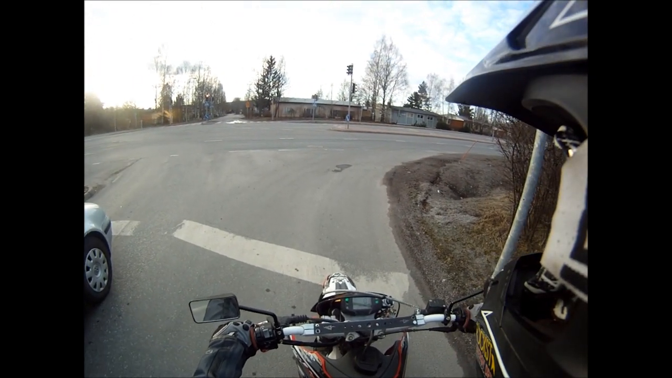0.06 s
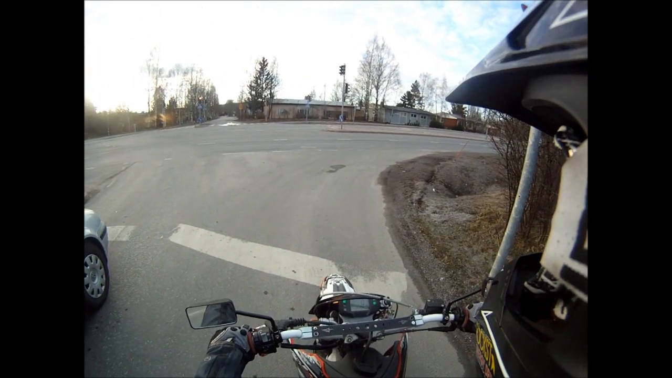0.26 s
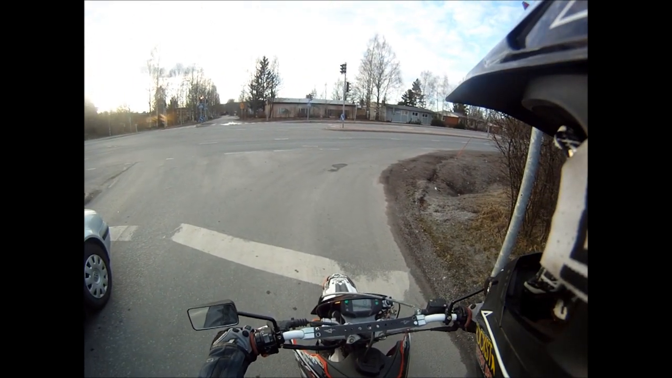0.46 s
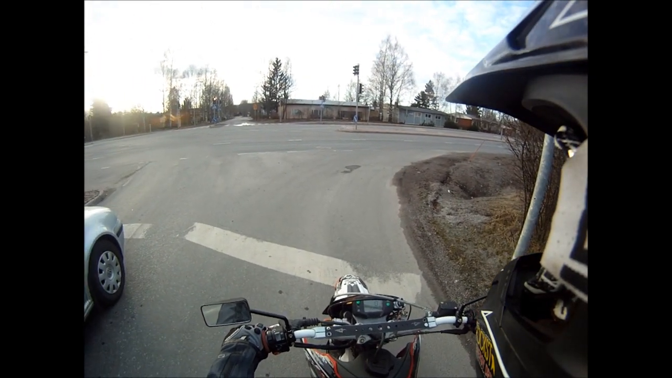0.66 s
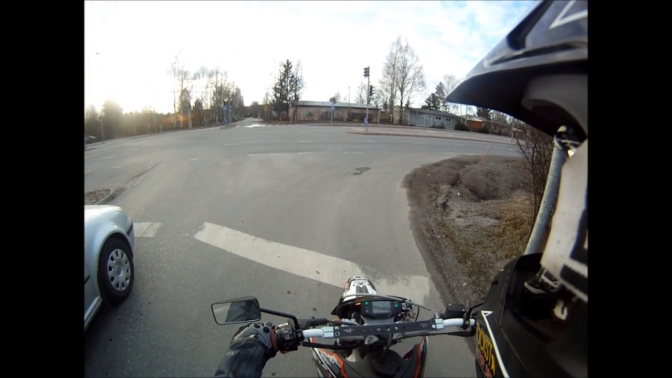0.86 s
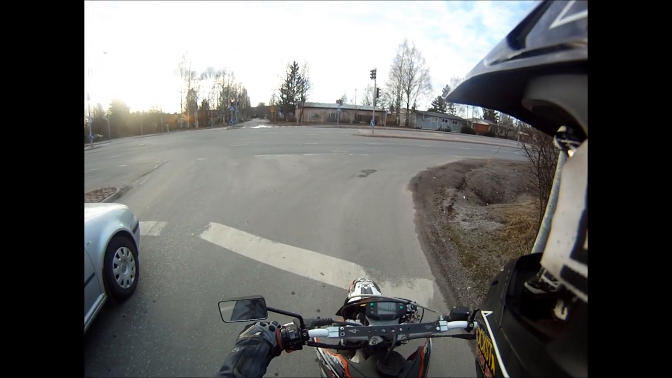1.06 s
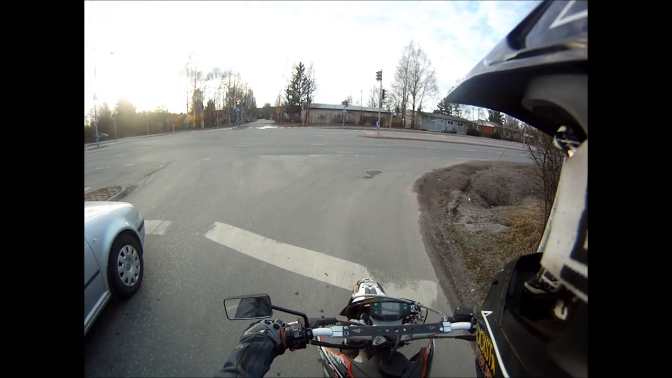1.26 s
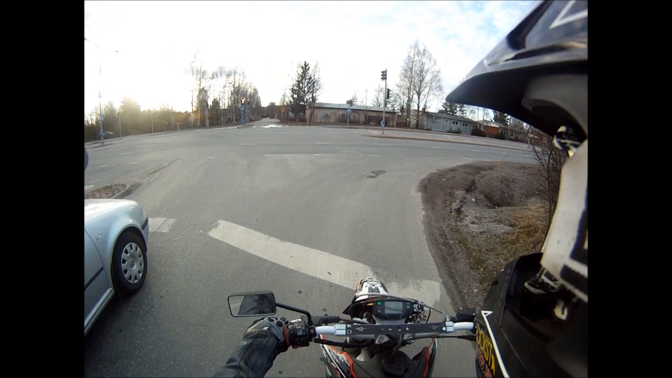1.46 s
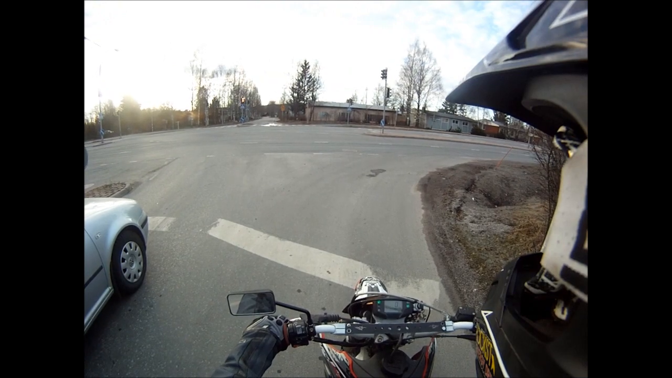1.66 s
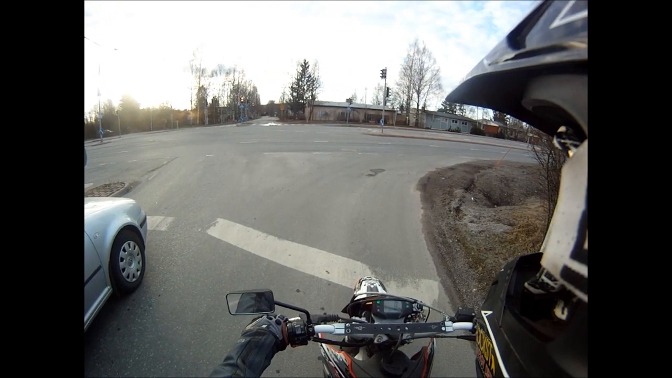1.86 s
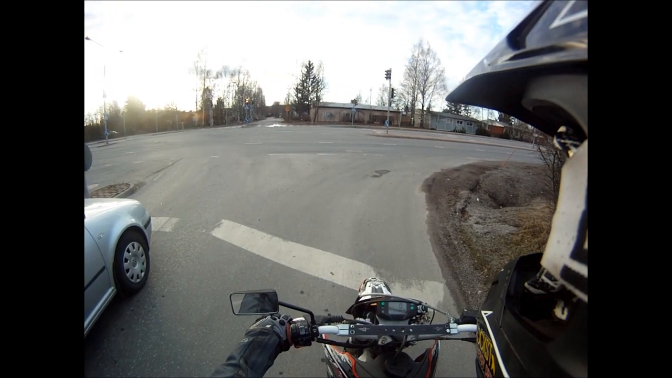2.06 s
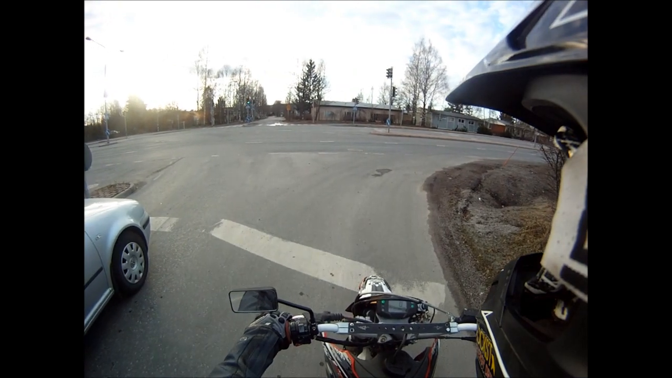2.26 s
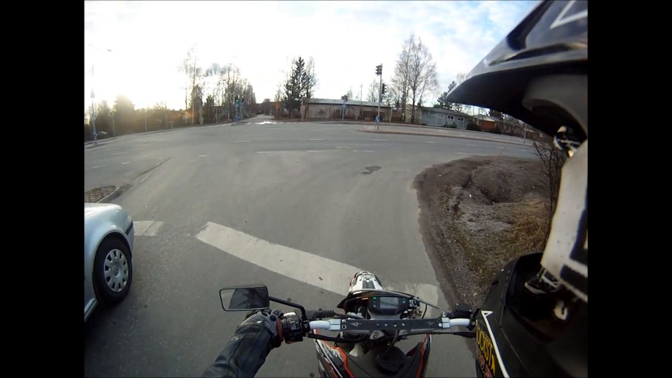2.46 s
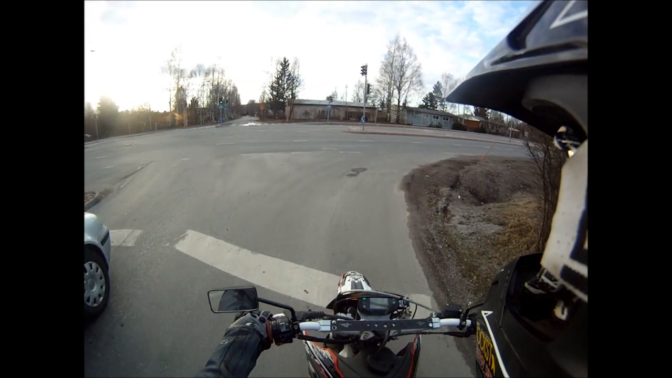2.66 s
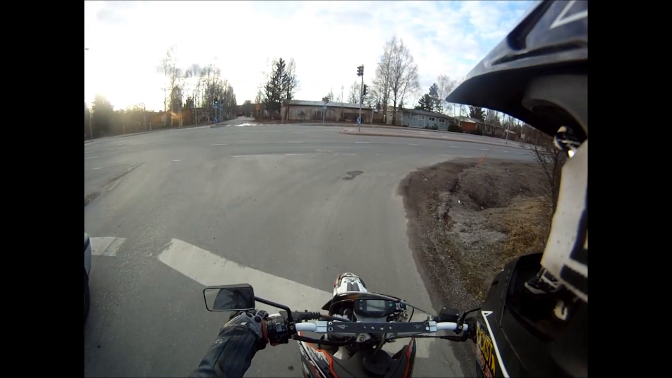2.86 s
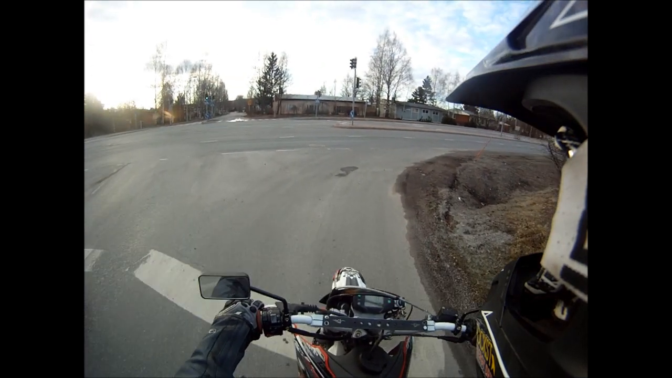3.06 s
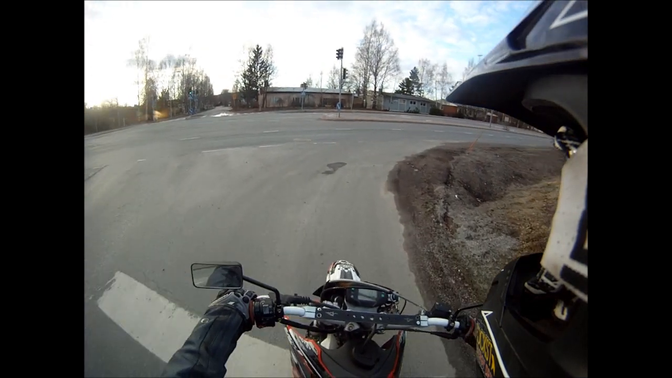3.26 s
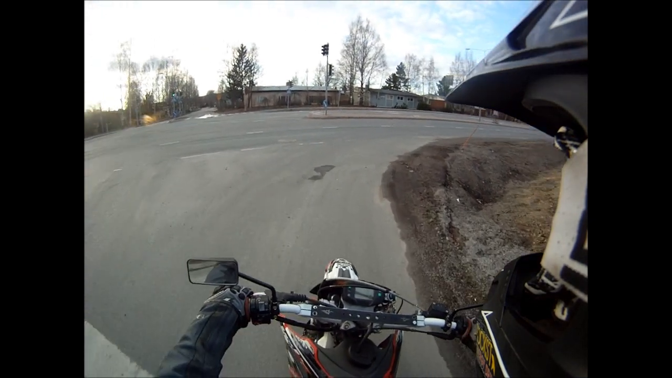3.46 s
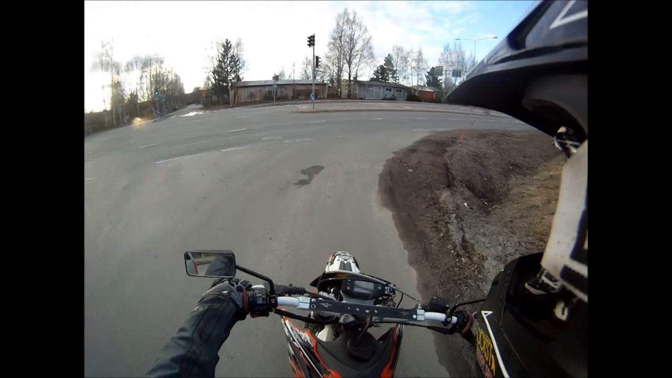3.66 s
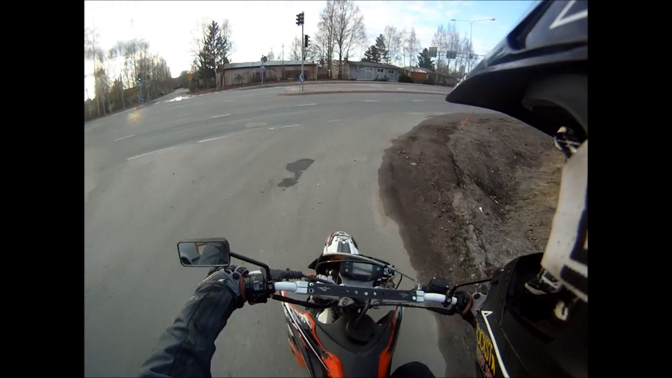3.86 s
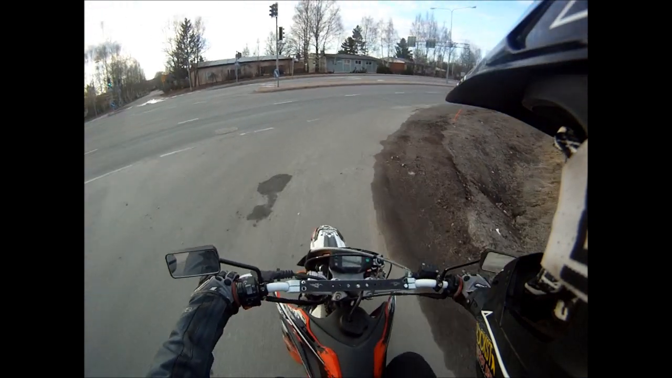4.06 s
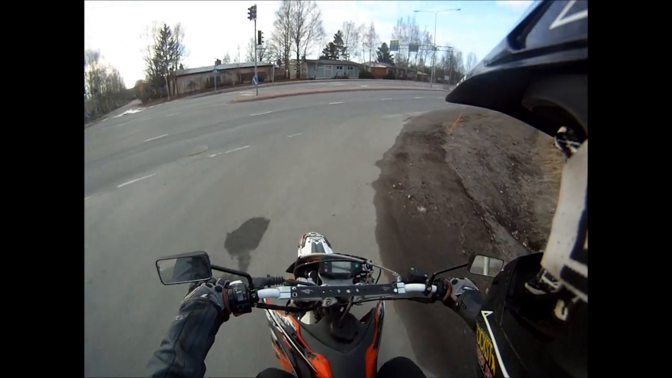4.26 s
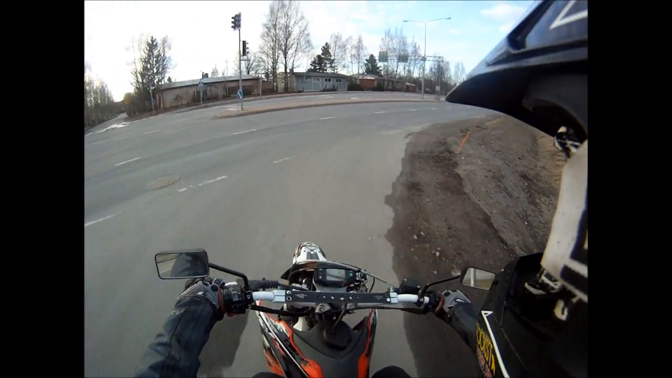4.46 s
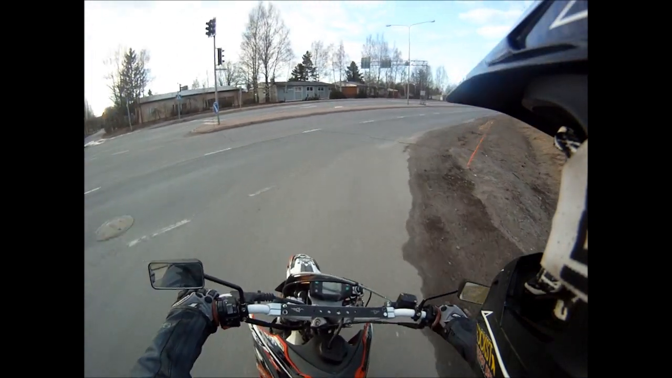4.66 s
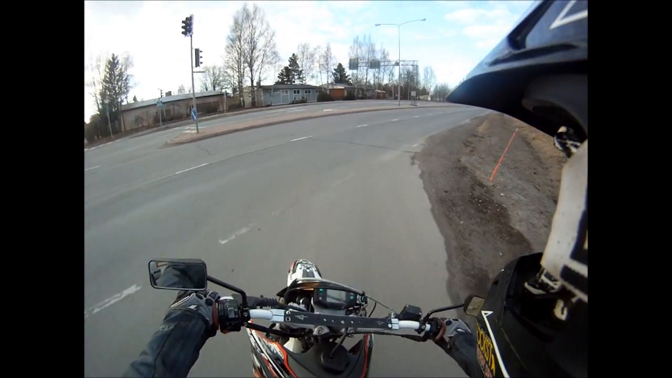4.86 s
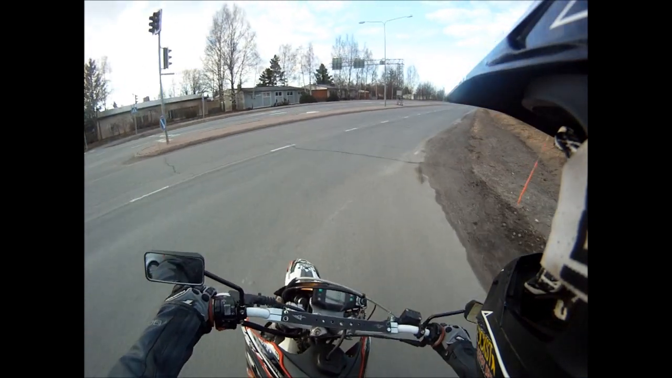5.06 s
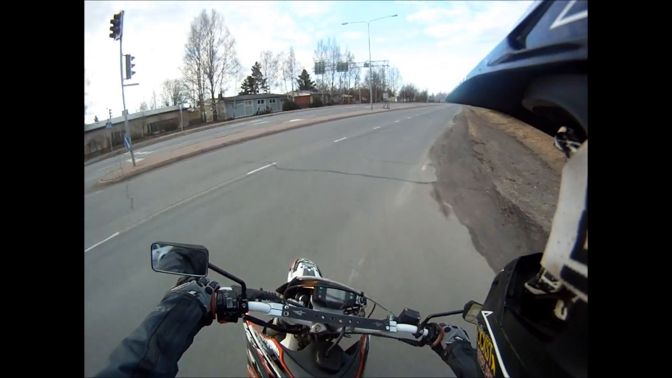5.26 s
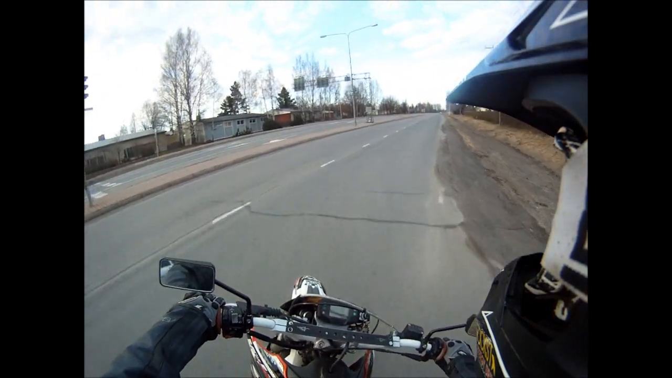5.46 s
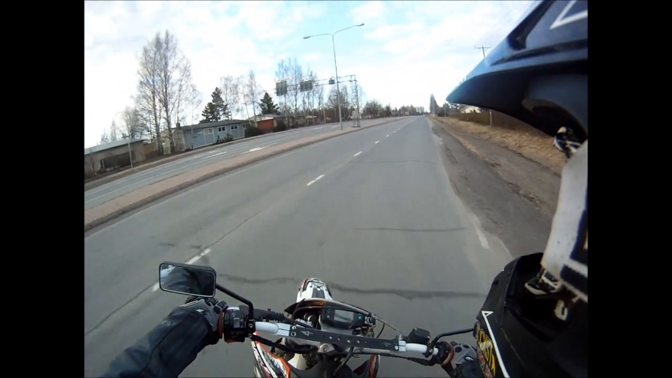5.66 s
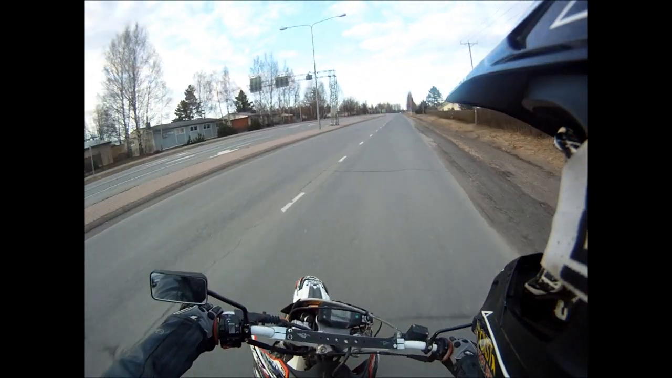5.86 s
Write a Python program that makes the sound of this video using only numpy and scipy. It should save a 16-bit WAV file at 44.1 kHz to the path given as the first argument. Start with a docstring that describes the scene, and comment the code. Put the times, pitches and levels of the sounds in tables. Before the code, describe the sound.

A mono helmet microphone sits close above a small two-stroke motorcycle, outdoors at a road junction. From 0 to 1.5 s the engine idles lumpily, about ten uneven soft chugs a second over bright metallic clatter, with sharper ticks near 0.25 and 0.7 s. A waiting car adds a very low, faint throb that falls behind after 2.1 s. At about 1.6 s the throttle is cracked: the exhaust swells into a ragged, honking, stuttering note, with a short row of fading knocks from 2.1 s. At 2.5 s it opens wide with a deep gulp and becomes a clean, hollow boom, holding nearly steady and creeping upward until 4.4 s. Brief misfires stutter around 4.5 to 4.9 s, then the pitch climbs fast, barking and rasping around 5 to 5.5 s, still rising at the end near 5.9 s. Low wind lumps buffet faintly around 5 s; thin, coarse fizz coats everything.

```python
"""A small two-stroke motorcycle idles lumpily and pulls away; its exhaust pulses ring the pipe, silencer and mouth.
It fires hard on every second turn as the throttle opens, runs clean, stutters again and revs out.
Piston slaps ring the metal fins close below; a waiting car, a low two-tone throb, falls behind.
The microphone is a camera on the rider's helmet: noise shaped as wind buffets it,
and its coarse sampling mirrors the sound into a thin fizz."""
import sys
import numpy as np
from scipy import signal
from scipy.fft import rfft, irfft, next_fast_len
from scipy.io import wavfile
from scipy.ndimage import map_coordinates

SR = 44100
rng = np.random.default_rng(int(sys.argv[2]) if len(sys.argv) > 2 else 0)


def log_audio(samples):
    """Write samples as a 16-bit WAV file to the path given in sys.argv[1]."""
    # one column per channel
    frames = np.atleast_2d(samples).T
    # limit to full scale, then quantise
    limited = np.clip(frames, -1, 1)
    pcm = np.round(limited * 32767).astype(np.int16)
    wavfile.write(sys.argv[1], SR, pcm)


N = 261072
TIME = np.arange(N) / SR  # seconds


def amp(db):
    """Decibels to gain."""
    return 10 ** (np.asarray(db) / 20)


def unit(x):
    """x at rms 1."""
    return x / np.sqrt(np.mean(x ** 2) + 1e-20)


def even(x, size=4001):
    """x at a running rms of 1 under a bell window of 2 * size samples; faster throbs stay."""
    window = np.hanning(2 * size)
    energy = signal.fftconvolve(x ** 2, window, "same")
    weight = signal.fftconvolve(np.ones(N), window, "same")
    return x / np.sqrt(np.abs(energy / weight) + 1e-14)


def curve(rows):
    """Rows of (seconds, value) as one value per sample."""
    return np.interp(TIME, *np.transpose(rows))


def wobble(rate):
    """A smooth random curve, rate knots a second."""
    knots = rng.standard_normal(int(N * rate / SR) + 4)
    return map_coordinates(knots, [TIME * rate / SR])


def hump(x, centre, width):
    """A bell of height 1 around the centre."""
    return np.exp(-.5 * ((x - centre) / width) ** 2)


def opened(start_s, end_s):
    """A straight movement from 0 to 1, such as a throttle's."""
    return np.clip((TIME - start_s) / (end_s - start_s), 0, 1)


def settling(start_s, time_s):
    """1 until the start, then dying away to 0."""
    return np.exp(-np.maximum(TIME - start_s, 0) / time_s)


def noise():
    """White noise."""
    return rng.standard_normal(N)


def pulses(times, sizes, order=8):
    """Impulses placed between samples, each a windowed sinc."""
    at = np.floor(times * SR).astype(int)[:, None] + np.arange(1 - order, order + 1)
    offset = at - times[:, None] * SR
    inside = (at >= 0) * (at < N)
    shape = sizes[:, None] * np.sinc(offset) * np.sinc(offset / order) * inside
    return np.bincount(np.clip(at, 0, N - 1).ravel(), shape.ravel(), N)


def puffs(times, sizes, decay_s):
    """Noise that flares at each time and dies away."""
    kicks = np.bincount(np.clip(times * SR, 0, N - 1).astype(int), sizes, N)
    flare = signal.lfilter([1], [1, -np.exp(-1 / (SR * decay_s))], kicks)
    return flare * noise()


def ring(x, points):
    """x through a minimum-phase body with the (Hz, dB) response: nothing sounds before it is struck."""
    m = 2 * next_fast_len(N)
    hz, db = np.transpose(points)
    log_hz = np.log(np.fft.rfftfreq(m, 1 / SR) + 1)
    cepstrum = irfft(np.log(amp(np.interp(log_hz, np.log(hz), db))))
    # folding the cepstrum onto positive time makes the response causal
    cepstrum[1:m // 2] *= 2
    cepstrum[m // 2 + 1:] = 0
    return irfft(rfft(x, m) * np.exp(rfft(cepstrum)))[:N]


def resonance(x, hz, q):
    """The part of x that one mode picks up."""
    return signal.lfilter(*signal.iirpeak(hz, q, SR), x)


def linger(x, hz, width_hz):
    """A cavity stores sound near its resonance and lets it out late (an all-pass)."""
    radius = np.exp(-np.pi * width_hz / SR)
    poles = np.array([1, -2 * radius * np.cos(2 * np.pi * hz / SR), radius ** 2])
    return signal.lfilter(poles[::-1], poles, x)


def diffuse(x, t60):
    """x smeared by a dying noise tail, like many close metal modes that fall 60 dB in t60 seconds."""
    t = np.arange(SR // 8) / SR
    tail = rng.standard_normal(len(t)) * amp(-60 * t / t60)
    return signal.fftconvolve(x, tail / np.linalg.norm(tail))[:N]


# Steady air on the helmet microphone. Each row: time in seconds, level in dB.
WIND_LEVEL = [(1.6, -42), (3, -52), (4, -47), (5.9, -43)]
# Two gusts on top of it. Each row: centre in seconds, added level in dB.
WIND_GUSTS = [(4.99, -35.5), (5.38, -42)]
# Tone of the air around the helmet. Each row: frequency in Hz, gain in dB.
WIND_TONE = [(12, -27), (25, -15), (50, -5), (100, -6.5), (200, -23), (600, -52), (3000, -95)]
GUST_WIDTH_S = 0.081


def wind():
    """Air buffets the helmet in lumps of low noise, with two gusts as the bike gathers speed."""
    gusts = sum(amp(db) * hump(TIME, s, GUST_WIDTH_S) for s, db in WIND_GUSTS)
    lumps = amp(2 * wobble(8.9))
    return (amp(curve(WIND_LEVEL)) + gusts) * unit(lumps * ring(noise(), WIND_TONE))


CAR_DB, CAR_LEFT_S, CAR_FADE_DB_PER_S = -41, 2.15, 20


def car():
    """The waiting car's engine throbs deep, a wavering tone and its octave, and falls behind."""
    phase = 2 * np.pi * np.cumsum(27.5 + .2 * wobble(3)) / SR
    level_db = CAR_DB - CAR_FADE_DB_PER_S * np.maximum(TIME - CAR_LEFT_S, 0)
    return amp(level_db) * unit(np.sin(phase) + amp(-12.5) * np.sin(2 * phase))


CRACK_S, OPEN_S = 1.582, 2.535  # the throttle is cracked, then opened wide
SKIP_SHARE, SKIP_EASING = 0.51, .5  # charge lost on every second turn; how far that clears up


def four_stroking(times):
    """Share of charge lost on every second turn: sets in with the throttle, eases, ends when it opens wide."""
    easing = 1 - SKIP_EASING * opened(2.3, 2.31)
    share = SKIP_SHARE * opened(1.6, 1.88) * easing * (TIME < OPEN_S)
    return np.interp(times, TIME, share)


# The crank idles, is blipped, held on the slipping clutch and revved out.
# Each row: time in seconds, speed in turns a second.
CRANK_SPEED = [(1.644, 40.3), (1.762, 49.3), (1.827, 48.1), (1.945, 60.7), (2.119, 66.0), (2.304, 64.0),
               (2.528, 64.7), (2.967, 79.7), (3.393, 81.9), (3.689, 84.7), (4.042, 85.5), (4.441, 89.5),
               (4.867, 99.2), (5.011, 104.1), (5.155, 111.8), (5.468, 125.7), (5.738, 141.9), (5.87, 146.4)]
# Spells of misfiring. Each row: first turn in seconds, last turn in seconds, mean share of charge lost (0 to 1).
MISFIRE_SPELLS = [(4.5, 4.5, .7), (4.662, 4.88, .78), (4.94, 4.94, .75), (5.905, 5.905, .58)]
MISFIRE_SCATTER = .12  # spread of the share lost from one misfire to the next


def crank():
    """Time and burnt charge of every turn of the crank; in a spell of misfiring every third turn fails."""
    angle = np.cumsum(curve(CRANK_SPEED)) / SR  # in turns
    angle -= np.interp(1.816, TIME, angle)  # one turn falls exactly at 1.816 s
    turn = np.arange(np.ceil(angle[0]), angle[-1])
    times = np.interp(turn, angle, TIME)
    lost = (turn % 2) * four_stroking(times)
    for first_s, last_s, share in MISFIRE_SPELLS:
        first = np.argmin(np.abs(times - first_s))
        last = np.argmin(np.abs(times - last_s))
        failed = np.arange(first, last + 1, 3)
        lost[failed] = np.clip(share + MISFIRE_SCATTER * rng.standard_normal(len(failed)), 0, 1)
    # unburnt mixture makes the next bang stronger
    return times, 1 - lost + 0.085 * np.roll(lost, 1)


# Ring of the clutch and gear case, also struck by the knocks. Each row: frequency in Hz, gain in dB.
CASE_RING = [(400, -22.5), (750, -1.5), (1000, -9.5), (1300, -1), (1550, -2.5), (1850, -18), (2600, -21),
             (6000, -54)]


def gears():
    """The slipping clutch churns in its case as shaped noise and quietens as it grips."""
    level_db = -42.0 - 4.5 * opened(2.6, 3.4) + 0.68 * wobble(12)
    return amp(level_db) * unit(ring(noise(), CASE_RING))


RATTLE_S, RATTLE_DB, RATTLE_FADE_DB = 2.1047, -17, 1.5  # start, first strength, loss per slap


def rattle(times, count=7):
    """As the clutch bites the piston slaps on every fourth turn, ever softer: rows of (s, dB)."""
    turns = times[np.argmin(np.abs(times - RATTLE_S))::4][:count]
    strength_db = RATTLE_DB - RATTLE_FADE_DB * np.arange(count)
    return np.column_stack([RATTLE_S + turns - turns[0], strength_db])


# Single hard piston slaps, close to the microphone. Each row: time in seconds, strength in dB.
HARD_SLAPS = [(0.2493, -22), (0.7206, -27), (1.9524, -18), (4.5925, -30.5), (4.6982, -29), (4.7416, -24)]
# The cylinder's metal ring, also heard in the clatter. Each row: frequency in Hz, gain in dB.
FIN_RING = [(1000, -35.5), (1700, -8.5), (1980, -4.5), (2180, -0.5), (2820, 0.5), (3090, -8), (3520, -15),
            (3870, -12), (4100, -16), (4770, -12), (5900, -25.5), (7670, -57), (13000, -120)]


def knocks(times):
    """Now and then the piston slaps hard enough to tick in the fins and the gear case."""
    s, db = np.vstack([HARD_SLAPS, rattle(times)]).T
    slaps = puffs(s, amp(db), decay_s=0.0058)
    ticks = ring(slaps, FIN_RING) + 1.3 * ring(slaps, CASE_RING)
    # the loudest tick peaks at the highest strength
    return amp(np.max(db)) * ticks / np.max(np.abs(ticks))


# The scattered firings at idle, all equally strong. Each entry: time in seconds.
IDLE_FIRINGS = [.014, .1, .203, .26, .341, .441, 0.528, .652, .722, .805, .901, .978, 1.045, 1.126, 1.234,
                1.332, 1.403, 1.491, 1.541, 1.628, 1.687]


def chugging(width_s):
    """The swell of each firing at idle, about 1 high."""
    return sum(hump(TIME, s, width_s) for s in IDLE_FIRINGS)


CLATTER_DB, CLATTER_THROTTLE_DB = -37, 1.5  # at idle; more once the throttle is off its stop
SMOOTH_TURNS, SMOOTH_DB_PER_TURN = 135, 0.22  # above these turns a second the clatter recedes
BUZZ_TURNS, BUZZ_GROWTH = 59.5, 1.22  # turns a second at which the buzz gain is 1; how steeply it grows


def clatter(times, charge):
    """The piston slaps at both ends of its stroke and the fins ring; with revs the slaps merge into a buzz."""
    speed = curve(CRANK_SPEED)
    strokes = np.concatenate([times[:-1], times[:-1] + 0.38 * np.diff(times)])
    force = np.concatenate([.5 + .5 * charge[:-1], np.full(len(times) - 1, .6)])
    force = force * amp(6.0 * rng.standard_normal(len(strokes)))
    slaps = even(puffs(strokes, force, decay_s=0.0094)) + 1.52 * noise()
    beats = pulses(times, charge)
    buzz = (speed / BUZZ_TURNS) ** BUZZ_GROWTH * even(beats + 5.6 * diffuse(beats, t60=0.14))
    metal = ring((slaps + buzz) * (1 + 0.59 * chugging(width_s=0.0092)), FIN_RING)
    # two fin modes sing out at low revs
    singing = sum(resonance(metal, hz, q=46) for hz in (2430, 2890))
    level_db = CLATTER_DB + CLATTER_THROTTLE_DB * opened(CRACK_S, 1.8)
    level_db = level_db - SMOOTH_DB_PER_TURN * np.maximum(speed - SMOOTH_TURNS, 0)
    return amp(level_db) * even(metal + 0.8 * (1 - opened(1.8, 1.81)) * singing)


# The muffled pipe on little or no throttle, also heard in the pickup. Each row: frequency in Hz, gain in dB.
MUFFLED_PIPE = [(30, -41), (62, -21), (130, -17.5), (192, -16), (224, 0.5), (256, 2.5), (290, -4),
                (330, -8.5), (384, -16.5), (440, -10.5), (495, -23), (548, -10), (610, -19), (740, -37),
                (1550, -42.5), (3000, -90)]
# The whole pipe shaking at each idle firing. Each row: frequency in Hz, gain in dB.
SHAKEN_PIPE = [(60, -42), (120, -20), (175, -13), (205, -7.5), (240, -7), (270, -7.5), (320, -1),
               (395, -2.5), (440, -7), (490, -7.5), (600, -21), (800, -30), (1320, -34), (3000, -67)]


def idle(times):
    """The piston pumps a soft pulse every turn; the few turns that fire shake the whole pipe."""
    swell = chugging(width_s=0.017)
    scatter = rng.standard_normal((len(times), 2))
    strokes = pulses(times + 0.00011 * scatter[:, 0], amp(scatter[:, 1]))
    pumping = even(linger(ring(strokes, MUFFLED_PIPE), hz=239, width_hz=130))
    rough = noise() + 1.05 * unit(diffuse(strokes, t60=0.063))
    shake = even(ring(rough, SHAKEN_PIPE), size=500)
    chug = amp(-26.5) * shake * (.5 + swell)
    return (1 - opened(2.11, 2.12)) * (amp(-32) * pumping * (1 + 0.19 * swell) + chug)


PICKUP_DB, PICKUP_RISE_DB, PICKUP_RISE_S = -14, 20, 0.1  # swells to its level from this much lower


def pickup(times, charge):
    """On little throttle the ragged firings ring one low note of the silencer; a brief blip adds its honk."""
    scatter = rng.standard_normal((len(times), 2))
    ragged = np.interp(times, [1.75, 2.2], [3, 1])
    sizes = charge * amp(0.48 * ragged * scatter[:, 1])
    bangs = pulses(times + .00005 * ragged * scatter[:, 0], sizes)
    pipe = linger(ring(bangs, MUFFLED_PIPE), hz=568, width_hz=52)
    blip = np.interp(TIME, [1.8, 1.95, 2.15], [0, 1.8, 0])
    honk = resonance(pipe, hz=325, q=5.2)
    level_db = PICKUP_DB - PICKUP_RISE_DB * settling(CRACK_S, PICKUP_RISE_S)
    return -amp(level_db) * even(pipe + blip * honk, size=2500)


# The jet's resonances at the pipe mouth. Each row: frequency in Hz, gain in dB.
MOUTH_RING = [(600, -45), (760, -17), (870, -14), (970, -22), (1080, -1), (1150, -7), (1235, 2),
              (1320, -10), (1410, -4), (1480, -14), (1560, -8), (1900, -19), (2750, -11), (3300, -28),
              (6000, -48)]
RASP_DB, RASP_FLUTTER_DB = -36, 1.5  # base level; the jet is never quite steady
RASP_FADE_DB_PER_TURN = 0.5  # the rasp thins out at the highest revs
POWER_TURNS, POWER_WIDTH, POWER_DB = 114.5, 9.5, 4  # power band in turns a second; rise of the rasp there
FILL_S, RASP_FILL_DB = 0.52, 3  # boom and rasp build up after wide opening; the rasp from this much lower


def rasp(fired, sizes):
    """The jet at the mouth flares whenever a harmonic climbs through a resonance, most in the power band."""
    speed = curve(CRANK_SPEED)
    level_db = RASP_DB + POWER_DB * hump(speed, POWER_TURNS, POWER_WIDTH)
    level_db = level_db - RASP_FADE_DB_PER_TURN * np.maximum(speed - SMOOTH_TURNS, 0)
    level_db = level_db - RASP_FILL_DB * settling(OPEN_S, FILL_S)
    mouth = linger(ring(pulses(fired, sizes), MOUTH_RING), hz=1228, width_hz=230)
    return amp(level_db + RASP_FLUTTER_DB * wobble(11)) * unit(mouth)


WARM_START_S, WARM_END_S = 3.68, 4.5  # the pipe heats up and loses its first notes
# The silencer's resonances. Each row: frequency in Hz, gain in dB.
SILENCER_RING = [(200, -56), (350, -36), (405, -2), (460, -0.5), (520, 0), (560, -4), (585, -11.5),
                 (630, 1.5), (670, -7.5), (720, -19), (760, -31.5), (900, -31.5), (1500, -67)]
# Extra ring of the silencer while cool. Each row: frequency in Hz, gain in dB.
COOL_RING = [(408, 6.5), (660, 2)]
# Course of the bark, before its gain. Each row: time in seconds, level in dB.
BARK_COURSE = [(2.55, -30.5), (2.62, -22), (2.72, -31), (3.24, -32), (5.02, -19.5), (5.48, -25.5),
               (5.63, -35), (5.72, -27), (5.87, -26), (5.92, -31)]
BARK_GAIN_DB = 0.5


def bark(fired, sizes):
    """The silencer barks above the boom; its colour shifts as it warms."""
    silencer = linger(ring(pulses(fired, sizes), SILENCER_RING), hz=598, width_hz=102)
    notes = sum(amp(db) * resonance(silencer, hz, q=11) for hz, db in COOL_RING)
    cool = 1 - opened(WARM_START_S, WARM_END_S)
    return amp(curve(BARK_COURSE) + BARK_GAIN_DB) * even(silencer + cool * notes)


# The expansion pipe's resonances. Each row: frequency in Hz, gain in dB.
PIPE_RING = [(30, -20), (68, -17.5), (90, -17), (115, -15.5), (160, -18), (190, -8.5), (215, -2),
             (255, 0.5), (295, 3), (328, -0.5), (355, -10.5), (385, -10.5), (440, -65.5), (700, -70)]
BOOM_DB, FILL_DB = -13, 2  # full level; it starts this much lower
HANDOVER_TURNS, HANDOVER_WIDTH, HANDOVER_DB = 104.3, 7.3, 2.5  # the boom dips around these turns a second
GULP_HZ, GULP_DB, GULP_DELAY_S, GULP_WIDTH_S = 135, 4.5, 0.11, .13  # just after the throttle opens wide


def boom(fired, sizes):
    """The expansion pipe booms on one low note, with a gulp as the throttle opens wide."""
    # the piston still pumps air on a turn that fails to fire
    pipe = linger(ring(pulses(fired, 0.052 + sizes), PIPE_RING), hz=272.4, width_hz=60.5)
    warmth = opened(WARM_START_S, WARM_END_S)
    honk_lost = 0.61 * warmth * resonance(pipe, hz=360, q=2.8)
    gulp_swell = amp(GULP_DB) * hump(TIME, OPEN_S + GULP_DELAY_S, GULP_WIDTH_S)
    gulp = gulp_swell * resonance(pipe, hz=GULP_HZ, q=4)
    handover_db = HANDOVER_DB * hump(curve(CRANK_SPEED), HANDOVER_TURNS, HANDOVER_WIDTH)
    level_db = BOOM_DB - FILL_DB * settling(OPEN_S, FILL_S) - handover_db
    return amp(level_db) * even(pipe - honk_lost + gulp)


def pull(times, charge):
    """Under load one pulse per firing booms in the pipe, barks in the silencer and rasps at its mouth."""
    scatter = rng.standard_normal((len(times), 4))
    fired = times + .000015 * scatter[:, 0]
    sizes = charge * amp(0.067 * scatter[:, 1])
    flow = .25 + .75 * sizes
    barks = flow * amp(0.72 * scatter[:, 2])
    jets = flow * amp(.4 * scatter[:, 2])
    return -(boom(fired, sizes) + bark(fired, barks) + rasp(fired + .00001 * scatter[:, 3], jets))


# Tone of the rushing exhaust gas. Each row: frequency in Hz, gain in dB.
GAS_TONE = [(60, -16.5), (200, -9), (300, -1.5), (550, -6.5), (750, -18), (950, -20.5), (1300, -12.5),
            (1800, -29), (2500, -25.5), (6000, -50.5)]


def exhaust(times, charge):
    """The throttle opens in two steps; gas rushes out behind every pulse."""
    load = opened(OPEN_S, OPEN_S + 0.017)
    gas = amp(-31.0 - 2.7 * load) * even(ring(puffs(times, charge, decay_s=0.067), GAS_TONE))
    light = np.sqrt(1 - load) * pickup(times, charge)
    heavy = np.sqrt(load) * pull(times, charge)
    return opened(1.47, 1.754) * (gas + light + heavy)


def scene():
    """Wind at the helmet, the neighbouring car and the engine below the rider."""
    times, charge = crank()
    engine = gears() + knocks(times) + clatter(times, charge) + idle(times) + exhaust(times, charge)
    return (wind() + car() + engine)[None]


TOP_HZ = 15400  # nothing passes above


def record(dry):
    """The helmet camera samples at 12 kHz and holds each value, which mirrors the sound around 12 kHz."""
    coarse = signal.resample_poly(dry, 40, 147, axis=1)
    held = np.repeat(coarse, 8, axis=1)  # 96 kHz
    held = signal.resample_poly(held, 147, 320, axis=1)[:, :N]
    hz = np.fft.rfftfreq(N, 1 / SR)
    return irfft(rfft(held) * (hz > 10) * (hz < TOP_HZ), N)


dry = scene()
out = record(dry)
log_audio(out)
```